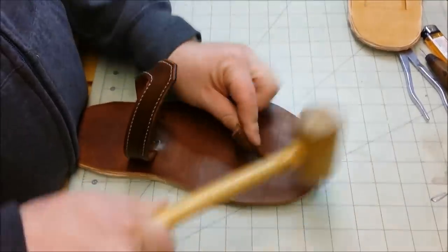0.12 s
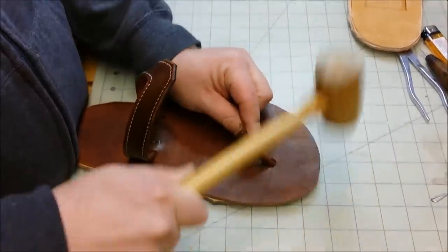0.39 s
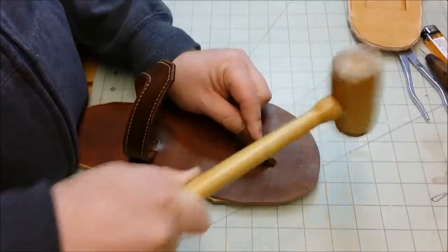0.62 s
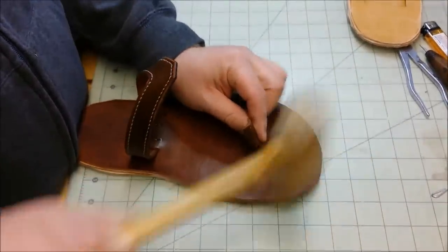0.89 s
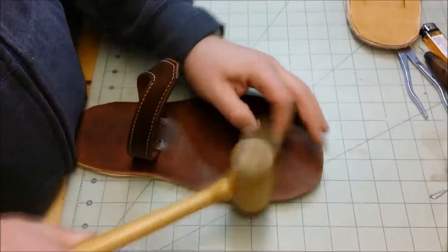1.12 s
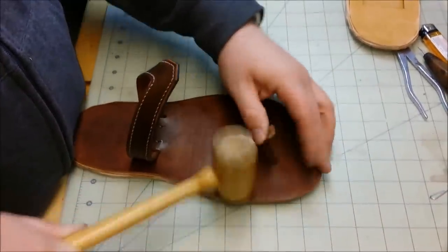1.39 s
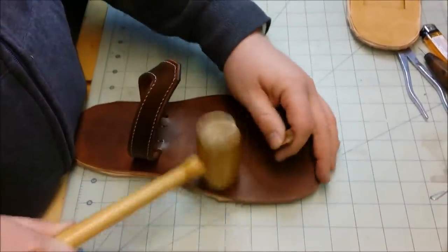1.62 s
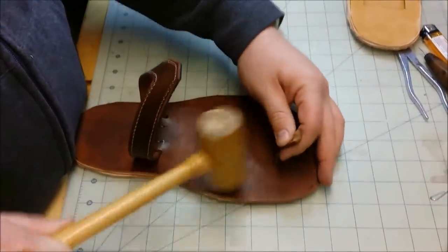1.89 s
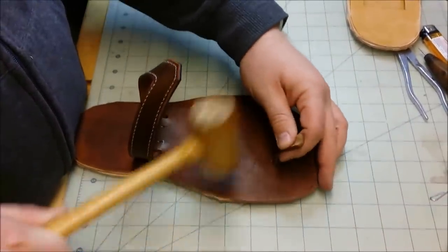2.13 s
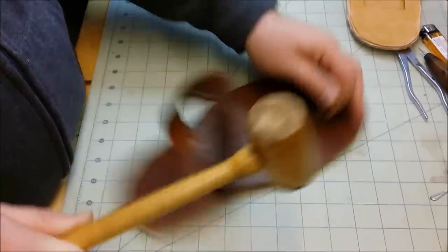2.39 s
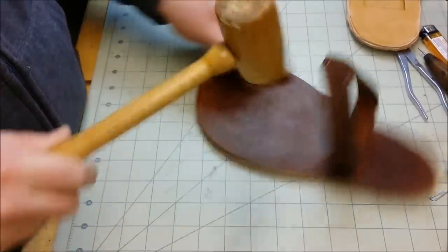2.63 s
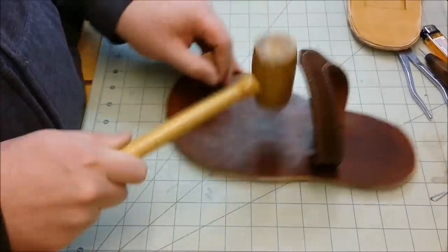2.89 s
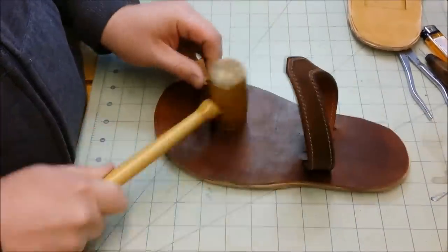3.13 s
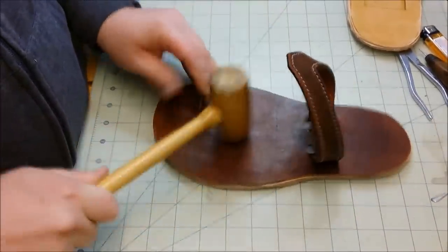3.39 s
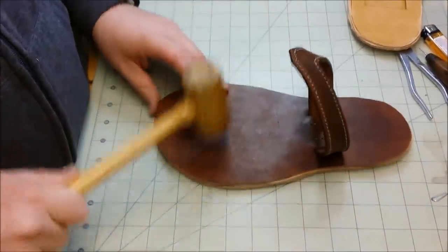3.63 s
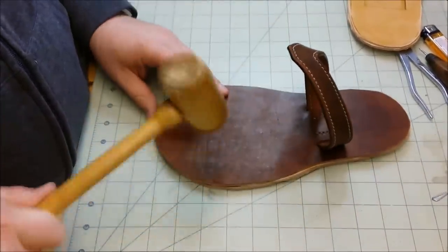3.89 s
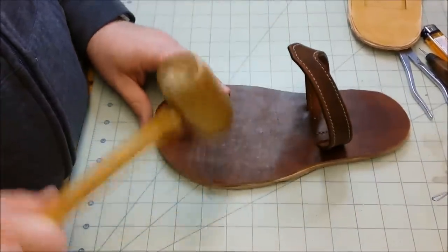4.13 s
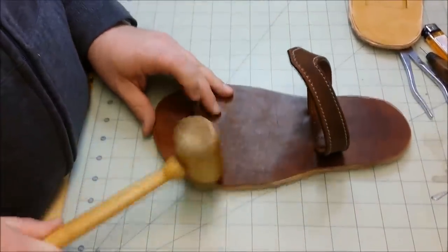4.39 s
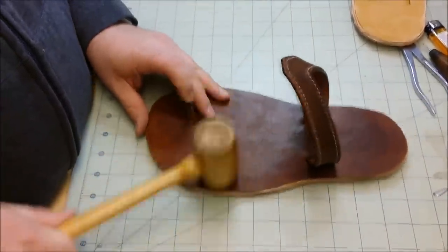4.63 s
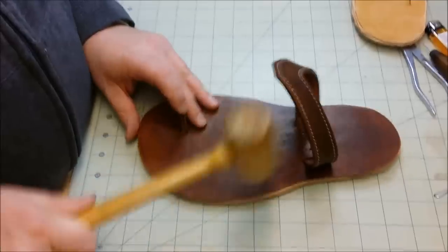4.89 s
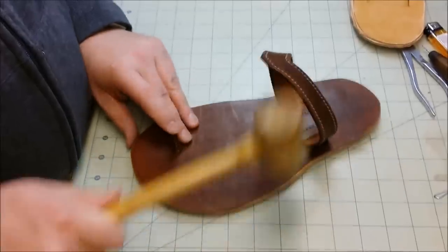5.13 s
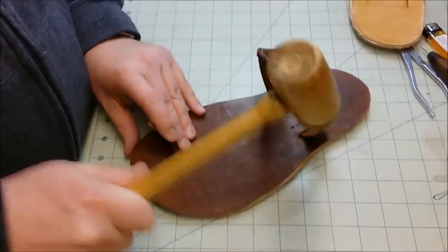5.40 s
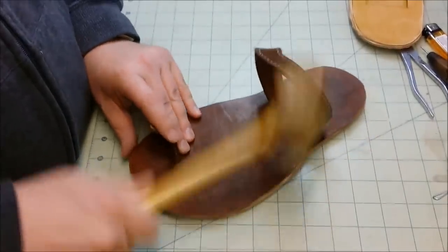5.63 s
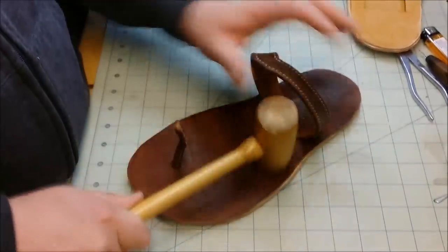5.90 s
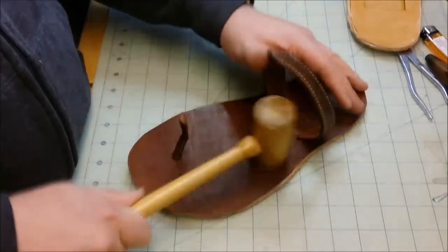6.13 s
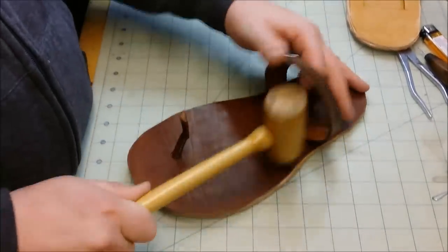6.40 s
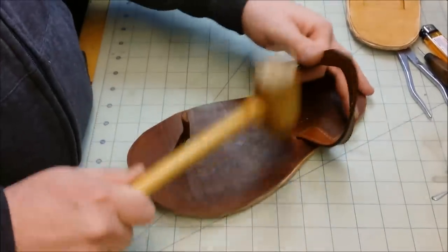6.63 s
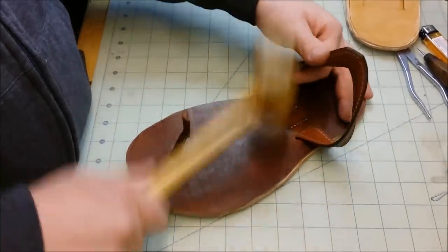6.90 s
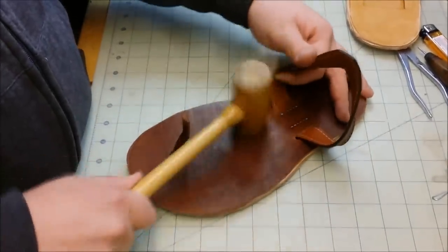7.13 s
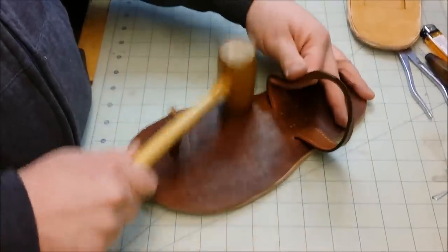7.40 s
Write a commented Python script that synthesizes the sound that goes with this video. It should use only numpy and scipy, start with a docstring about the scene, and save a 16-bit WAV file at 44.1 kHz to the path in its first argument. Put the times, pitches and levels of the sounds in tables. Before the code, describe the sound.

Brisk, even mallet blows on leather, woody knock with a slapping crack, one short pause with a soft slide and clink, more blows in a live workshop.

```python
"""Mallet on leather at a workshop bench

A wooden mallet taps a leather sole on a bench in a small workshop, close under a stereo microphone.
Each blow is a resonant knock and a noise crack, decaying bench modes, wall echoes and a diffuse tail.
In a pause the sole is turned on the mat (patchy noise) and something small clinks (scraped modes).
Two short faint noise bursts are heard, one just before the last blow. Low rumble, faint hiss and
far machine whines lie beneath."""
import sys
import numpy as np
from scipy import signal
from scipy.fft import rfft, irfft, next_fast_len
from scipy.io import wavfile
from scipy.ndimage import uniform_filter1d

SR = 44100
rng = np.random.default_rng(int(sys.argv[2]) if len(sys.argv) > 2 else 0)


def put_to_file(sound):
    """Save the sound as 16-bit audio at rate SR, in the file named by the first command-line argument."""
    columns = np.atleast_2d(sound).T  # one column per channel
    safe = np.clip(columns, -1, 1)
    whole_steps = np.round(safe * 32767)
    wavfile.write(sys.argv[1], SR, whole_steps.astype(np.int16))


def ratio_of_db(decibels):
    """Turn decibels (scalar or array-like) into linear amplitude factors; 0 dB maps to 1."""
    return 10 ** (np.asarray(decibels, float) / 20)


N = 331191

# spectrum of leather rubbed by the mat, which the faint bursts share: [f/Hz, relative level/dB per Hz]
LEATHER_RUB = [(530, -28), (900, -3.5), (1930, -6.5), (4730, -2.5), (5990, -3.5), (6740, -5),
               (15000, -22.5)]


def unit(x):
    """Scaled to rms 1."""
    return x / np.sqrt(np.mean(x ** 2) + 1e-20)


def along(points, hz):
    """(Hz, value) points read on a log frequency axis."""
    f, v = np.transpose(points)
    return np.interp(np.log(hz + 1), np.log(f + 1), v)


def filtered(x, response):
    """x times a complex response of frequency."""
    n = x.shape[-1]
    m = next_fast_len(n + 8192)
    spectrum = rfft(x, m) * response(np.fft.rfftfreq(m, 1 / SR))
    return irfft(spectrum, m)[..., :n]


def stereo(pair, spectrum, alike):
    """Two unrelated noises coloured and mixed to a left-right likeness (correlation by frequency)."""
    def mid_side_gains(hz):
        turn = np.arccos(np.clip(along(alike, hz), -1, 1)) / 2
        return ratio_of_db(along(spectrum, hz)) * [np.cos(turn), np.sin(turn)]

    mid, side = filtered(pair, mid_side_gains)
    return np.array([mid + side, mid - side])


def panned(db):
    """Left and right gains for a left-right difference in dB."""
    return ratio_of_db(np.multiply.outer([.5, -.5], db))


def add(out, x, s):
    """Adds x into out from time s, cut off at either end of out."""
    start = round(s * SR)
    part = out[:, max(start, 0):][:, :x.shape[1] + min(start, 0)]
    part += x[:, max(-start, 0):][:, :part.shape[1]]


def resonances(modes, hz):
    """Causal response of (Hz, width Hz, dB) resonances, in alternating polarity."""
    total = 0
    for k, (centre, width, db) in enumerate(modes):
        damping = 1j * hz * width
        total = total + (-1) ** k * ratio_of_db(db) * damping / (centre * centre - hz * hz + damping)
    return total


def building_rumble():
    """Low-frequency noise of the building, nearly alike at both ports."""
    # [f/Hz, relative level/dB per Hz]
    rumble_colour = [(15, -66), (25, -25), (38, -35.5), (52, -20), (71, 2.5), (92, 0.5), (150, -11),
                     (260, -33), (340, -83.5), (570, -120)]
    rumble = unit(stereo(rng.standard_normal((2, N)), rumble_colour, [(60, 0.96)]))
    return ratio_of_db(-75.5) * rumble * panned(-2)[:, None]


def hiss():
    """Broad noise of room and microphone, less alike between the ports as frequency rises."""
    # [f/Hz, relative level/dB per Hz]
    hiss_colour = [(150, 2.5), (300, 1), (550, 2), (1100, -7.5), (2500, -11), (5000, -15), (8000, -17.5),
                   (16000, -31.5), (16500, -32.5)]
    likeness = [(200, .6), (700, 0.25), (2000, .02)]
    return ratio_of_db(-80.5 - 4.5) * unit(stereo(rng.standard_normal((2, N)), hiss_colour, likeness))


def distant_whines():
    """Fuzzy tones of distant machines: noise through narrow resonances, applied twice over."""
    # [f/Hz, width/Hz, rms level/dB]
    whine_tones = [(765, 12, -97.5), (1070, 31, -99), (6500, 300, -100)]
    out = np.zeros((2, N))
    for hz, width, db in whine_tones:
        noise = rng.standard_normal((2, N))
        out += ratio_of_db(db) * unit(filtered(noise, lambda f: resonances([(hz, width, 0)], f) ** 2))
    return out


def faint_bursts():
    """Brief faint bursts of noise that die at once."""
    # [t/s, level before the decay/dB, decay/s]
    bursts = [(0.012, -83, .006), (7.3455, -70, .007)]
    out, t = np.zeros((2, N)), np.arange(SR // 10) / SR
    for s, db, decay in bursts:
        burst = unit(stereo(rng.standard_normal((2, len(t))), LEATHER_RUB, [(1000, 0.54)]))
        add(out, ratio_of_db(db) * burst * np.exp(-t / decay), s)
    return out


def slide():
    """Leather dragged over the mat: rubbing noise in patches that fades, swells a little and stops."""
    # start, slowest, settling, stopped; the level is given as changes from one to the next
    when_s = [2.33, 2.55, 2.66, 2.66 + .05]
    level_db = -80 + np.cumsum([0, -6.5, 2.5, -13])
    level = np.interp(np.arange(N) / SR, when_s, level_db, left=-140, right=-140)
    z = signal.stft(rng.standard_normal((2, N)), nperseg=512)[2]
    # smoothed over frequency, then over time
    patches = uniform_filter1d(rng.standard_normal(z.shape[1:]), size=10, axis=0)
    patches = uniform_filter1d(patches, size=6, axis=1)
    swish = signal.istft(z * ratio_of_db(2.3 * unit(patches)), nperseg=512)[1][:, :N]
    return ratio_of_db(level) * unit(stereo(swish, LEATHER_RUB, [(1000, 0.26)]))


def clink():
    """A small hard thing touches down twice: a short decaying scrape that rings its modes."""
    # touches: [t/s, level/dB, scrape decay/s]
    touches = [(2.714, -60.5, 0.0076), (2.724, -56, 0.0099)]
    # ringing of the small thing: [f/Hz, level/dB, t60/s]
    clink_modes = [(350, -14, 0.12), (2250, -14, .03), (3068, -12, .11), (3200, -15, .07), (3386, -13, 0.1),
                   (5033, -17, .03), (6266, -18, 0.04)]
    dull_hz = 7000  # the scrape falls off above this
    out, t = np.zeros((2, N)), np.arange(SR // 4) / SR
    ring = sum(ratio_of_db(db - 60 * t / t60) * np.sin(2 * np.pi * hz * t) for hz, db, t60 in clink_modes)
    for s, level_db, decay in touches:
        scrape = rng.standard_normal((2, len(t))) * np.exp(-t / decay)
        rung = signal.fftconvolve(scrape, ring[None], axes=1)[:, :len(t)]
        dulled = filtered(scrape, lambda f: 1 / (1 + 1j * f / dull_hz) ** 2)
        add(out, ratio_of_db(level_db) * (0.62 * dulled + 0.037 * rung), s)
    return out


def room_tail(t, tilt, room):
    """Diffuse room sound that swells fast; each frequency dies at its own speed, and the far end lingers."""
    # the room's diffuse answer to a blow: [f/Hz, level/dB]
    room_colour = [(60, -40), (150, -8), (500, -6.5), (900, -5), (1500, -13), (2500, -21), (4000, -27),
                   (6500, -31), (8500, -39.5), (15000, -49)]
    # its decay: [f/Hz, t60/s]
    room_t60 = [(100, 0.34), (400, 0.37), (1000, 0.3), (2500, 0.31), (6000, 0.25), (14000, 0.23)]
    # left-right likeness at the microphone: [f/Hz, correlation]
    room_alike = [(60, 0.85), (150, 0.9), (300, 0.35), (700, 0.1), (1400, -.1), (4000, 0), (15000, 0.2)]
    # part of the answer that is new at each blow: [f/Hz, share of power]
    room_fresh = [(600, .35), (1500, .6), (4000, .9)]
    # slow answer of the far end: [f/Hz, level/dB]
    far_colour = [(250, -49), (500, -33.5), (750, -21.5), (1000, -23.5), (1600, -36.5), (3000, -72.5)]
    far_t60 = 0.93  # s
    both = np.array([room, rng.standard_normal(room.shape)])
    hz, frames, (same, new) = signal.stft(both, SR, nperseg=256)
    # blows land close together, so their low answers are much alike
    fresh = along(room_fresh, hz)[:, None]
    z = np.sqrt(1 - fresh) * same + np.sqrt(fresh) * new
    near = ratio_of_db(along(room_colour, hz)[:, None] - 60 * frames / along(room_t60, hz)[:, None])
    far = ratio_of_db(along(far_colour, hz)[:, None] - 60 * frames / far_t60)
    noise = signal.istft(z * np.hypot(near, far), SR, nperseg=256)[1][:, :len(t)]
    # the room averages all directions, so it takes only part of a blow's own colour
    colour = [(f, 0.45 * db) for f, db in tilt]
    swell = 1 - np.exp(-(t / 0.0015) ** 2)
    return stereo(noise, colour, room_alike) * swell


def walls(x):
    """The sound and its delayed copies off the nearby walls."""
    # [delay/s, left level/dB, right level/dB]
    wall_echoes = [(.0067, -16, -12), (0.0126, -23, -15.5), (.021, -23.5, -23.5), (0.029, -25, -35.5),
                   (.0335, -26, -27)]
    out = x.copy()
    for s, left_db, right_db in wall_echoes:
        add(out, ratio_of_db(np.array([[left_db], [right_db]])) * x, s)
    return out


def contact(knock_db, crack_db, bright_db):
    """The knock of the head and the crack of air and leather layers slapping shut, at both ports."""
    # short resonances of the mallet head on leather: [f/Hz, width/Hz, level/dB]
    head = [(797, 163, 0.5), (1717, 194, 6), (2220, 780, -1.5)]
    # spectrum of the crack: [f/Hz, relative level/dB]
    crack_colour = [(900, -37.5), (1800, 7.5), (2800, 2.5), (4000, 0), (5000, -1.5), (6600, -2),
                    (8000, -11.5), (11000, -16.5), (15000, -25.5)]
    touch_s, snap_db = .0008, -10  # the head lands; the snap of first touch against the slap
    left_lead_s = .000025  # the mallet is nearer the left port
    t = np.arange(SR // 10) / SR

    # a short push, and a duller one as the sole meets the mat
    push = np.exp(-((t - .0012) / 0.00024) ** 2) + 0.37 * np.exp(-((t - .0031) / 0.00054) ** 2)
    knock_tilt = [(1000, 0.011), (1400, knock_db)]
    knock = filtered(push, lambda f: resonances(head, f) * ratio_of_db(3 + along(knock_tilt, f)))

    crack_tilt = [(3000, -bright_db / 2), (8000, bright_db / 2)]
    colour = lambda f: ratio_of_db(along(crack_colour, f) + along(crack_tilt, f))
    # one noise shared by the ports, plus one for each port
    noise = rng.standard_normal((3, len(t)))
    slap = filtered(noise[0] + 1.03 * noise[1:], colour)
    after = np.maximum(t - touch_s, 0)
    # a fast decay and a weaker, slower one
    decay = ratio_of_db(-60 * after / 0.0056) + ratio_of_db(-8.5 - 60 * after / 0.034)
    slap *= decay * (1 - np.exp(-after / 0.00015))
    click = 1. * (np.arange(len(t)) == round(touch_s * SR))
    snap = filtered(click, colour)
    crack = slap / np.linalg.norm(slap) + ratio_of_db(snap_db) * snap / np.linalg.norm(snap)
    crack = ratio_of_db(7 + crack_db) * crack

    sides = np.array([[1], [-1]])
    return filtered(knock + crack, lambda f: np.exp(1j * np.pi * f * left_lead_s * sides))


def mallet():
    """Each blow: the contact with its echoes, the decaying modes of the bench top and the room's tail."""
    # [t/s, strength/dB, knock/dB, crack/dB, rise of the crack from 3 to 8 kHz/dB]
    blows = [(-0.165, -28, 11, 5, -7), (0.0559, -28, 2.5, 4.7, -4), (0.2884, -24, -2.5, 2.5, -3.5),
             (0.5032, -25, -7, -2.5, 0.5), (0.7288, -24.5, -4, -0.5, -3), (0.9529, -24.5, 1.5, 5.5, -5),
             (1.165, -25, 0.5, 3, -6.5), (1.3899, -24, -4.5, -0.5, 0), (1.6204, -22.5, -5.5, -7.5, 1),
             (1.8323, -22.5, -1.5, -3, 6.5), (2.0533, -24, -1.5, 1.5, 2), (2.2549, -23, -2.5, -0.5, 1.5),
             (3.1171, -23.5, -2.5, -2.5, -4.5), (3.338, -21.5, 1, -5.5, 0.5), (3.5586, -24, -8, -1.5, -3.5),
             (3.774, -25, -0.5, -5, -1.5), (3.9908, -24, -1.5, -5.5, -2.5), (4.21, -23.5, 0.5, -1.5, -3),
             (4.416, -24, 0.5, -2.5, 0.5), (4.6222, -23, -0.5, -6.5, 6), (4.8347, -23, 3, -2.4, 1),
             (5.0511, -25, 3, -5, -2), (5.272, -26, 0.5, -3, 6), (5.486, -25.5, 3, 0, -1),
             (5.6818, -24, 2.8, -3.5, 0.5), (5.9036, -24, -4.5, 1.5, -1.5), (6.109, -24.5, 2, 1.5, 1),
             (6.31, -26, 2, 3.5, 1.5), (6.5371, -31.5, 3.5, 6, -4.5), (6.745, -29, 14, 2.5, -1),
             (6.9421, -30, 6.5, 3, 10.5), (7.1546, -25.5, 5.5, 0.5, 0.5), (7.3548, -25.5, 0, -4, -0.5)]
    # modes of the bench top:
    # [f/Hz, relative level/dB, t60/s, left-right difference/dB, polarity (sign), gain toward spot 1/dB]
    bench = [(82.8, -28, 0.35, -3.5, -2, 6), (103, -17, 0.25, -2.5, 0, 2), (137, -6.5, .25, 0, 0, 5.5),
             (148.2, -4, 0.34, -3, 0.4, 0.9), (177.4, -16.5, 0.21, 0.5, 0.81, -5.5),
             (222.8, -5.5, 0.14, 1, -0.5, 0.5), (250.2, -10, 0.36, -4.5, 4.5, -0.5),
             (293.4, -8.5, 0.32, 0.5, -0.02, 0.5), (275.3, -14, .15, 4, 2, 1),
             (336.9, -10.5, 0.21, 10.5, 1, 3.5), (355.2, -5, 0.25, -3, -0.68, -0.5),
             (401.4, -11.5, 0.21, 5.5, -1.38, 2), (446, -9.5, 0.3, 4, -0.18, -1.6),
             (456.4, -12, 0.074, 1, 1, -2.5), (480.2, -3, 0.19, 0.5, 0.03, -0.5),
             (508.7, -7, 0.31, -6, 0.5, -2), (535.2, -3, 0.2, -4, 0.7, -2),
             (598, -22.5, 0.19, -1.5, 0.71, -11.5), (600.5, -12, 0.2, -8.5, 2.5, 1),
             (637.7, -4.5, 0.1, -3, 1.1, -2.5), (685, -10.5, 0.099, -2.5, -0.07, 7.5),
             (716, -8.5, 0.18, 1.5, -1, -1.7), (727.5, -17.5, 0.61, -1, 2, -1),
             (702, -31, 1.4, -1.5, -2, -1), (550, -36, 1.8, 0, 2, -1), (762, -33, 1.3, -2, 1, 0),
             (772, -20.5, 0.37, -0.5, 0.83, 2.5), (780.5, -14.5, 0.3, 1.5, 0.5, 2),
             (807, -8, 0.097, -1.5, 0.5, 4.5), (823.5, -5, 0.068, -6, 0.5, 8),
             (858, -9, 0.33, 0.5, 0.87, -6.5), (904, -5.5, 0.22, 5, -0.92, -5.5),
             (944, -5.5, 0.21, -4, -1.43, -3.5), (984, -6, 0.035, -0.5, 0.5, 3.5),
             (1095, -9, 0.092, -14, 0.85, 1.5), (1172, -24.5, 0.3, -6, -1, 4.5),
             (1285, -8.5, 0.1, -8.5, 0, 0), (1324, -15, .15, -4.5, -1, 1),
             (1368, -14.5, 0.066, -5.5, 2.5, -2)]
    # the mallet works its way over the sole: [t/s, spot on the bench (-1 to 1), relative low thud there/dB]
    path = [(0, -0.052, -21.5), (.75, -0.18, -20.5), (1.165, 0.45, -23.5), (1.62, 0.15, -26),
            (2.25, 0.87, -27.5), (3.12, 0.25, -23), (3.56, 1, -29), (4.45, 1, -29), (5.49, -0.066, -26.3),
            (5.9, 0.0077, -24.5), (6.31, 0.19, -25.5), (6.54, 0.83, -27.5), (6.94, 0.51, -28),
            (7.36, 0.62, -25)]
    out, t = np.zeros((2, N)), np.arange(3 * SR // 4) / SR
    hz, db, t60, pan_db, polarity, spot_db = np.transpose(bench)
    modes = np.exp(2j * np.pi * np.outer(hz, t)) * ratio_of_db(-60 * t / t60[:, None])
    modes = modes * (1 - np.exp(-t / 0.0014))
    # a high mode reaches the two ports out of step
    lead = rng.standard_normal(len(hz)) * np.clip(hz / 1400, 0, 1) ** 2
    ports = panned(pan_db) * np.exp(1j * np.outer([.5, -.5], lead))
    when, spots, thuds_db = np.transpose(path)
    room = rng.standard_normal((2, len(t)))
    for s, strength_db, knock_db, crack_db, bright_db in blows:
        spot = np.interp(s, when, spots)
        thud_db = np.interp(s, when, thuds_db) - strength_db
        # the spot that is struck sets the strength of each mode; soft spots favour the low ones
        level = db + spot * spot_db + rng.normal(0, 1.0, len(hz)) + thud_db * (hz < 400) - 17
        start_phase = rng.normal(0, 0.58, len(hz)) * hz / 700
        strike = ports * np.sign(polarity) * ratio_of_db(level) * np.exp(1j * start_phase)
        ringing = np.imag(strike @ modes)
        tilt = [(300, thud_db), (450, 0.012), (1000, 0), (1400, knock_db), (2600, knock_db),
                (3600, crack_db - bright_db / 2), (8000, crack_db + bright_db / 2)]
        air = room_tail(t, tilt, room)
        add(air, walls(contact(knock_db, crack_db, bright_db)), 0)
        air_pan = panned(-1.9 - .6 * spot)[:, None]
        add(out, ratio_of_db(strength_db) * (ringing + air_pan * air), s)
    return out


def scene():
    """All sources together, from the background to the mallet."""
    background = building_rumble() + hiss() + distant_whines()
    return background + faint_bursts() + slide() + clink() + mallet()


def top_cut(x):
    """Nothing passes above the cut-off."""
    return signal.sosfilt(signal.butter(12, 16500, fs=SR, output="sos"), x)


def record(dry):
    """The microphone drops the deepest bass: a third-order high-pass at 45 Hz."""
    mix = filtered(dry, lambda hz: (1j * hz / (45 + 1j * hz)) ** 3)
    return top_cut(mix)


dry = scene()
out = record(dry)
put_to_file(out)
```